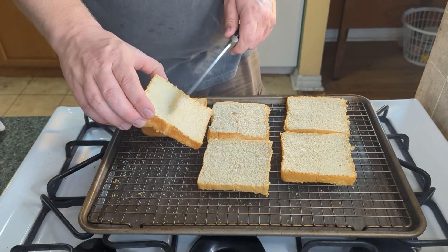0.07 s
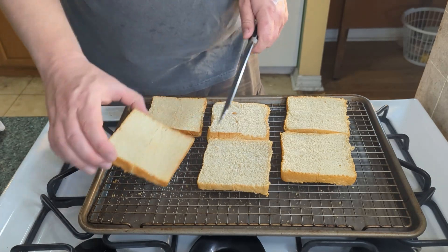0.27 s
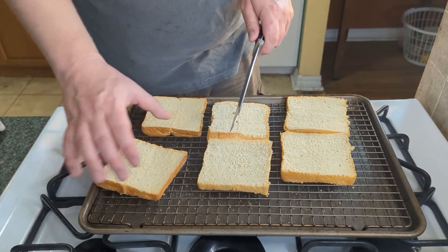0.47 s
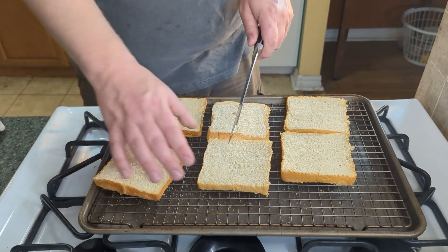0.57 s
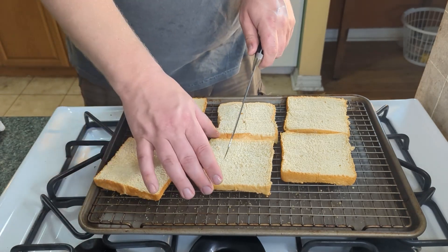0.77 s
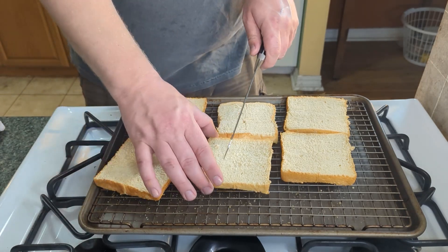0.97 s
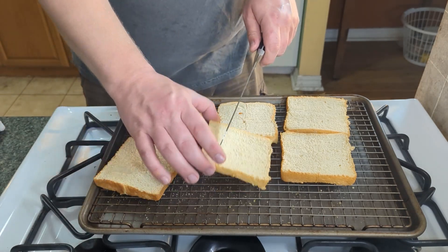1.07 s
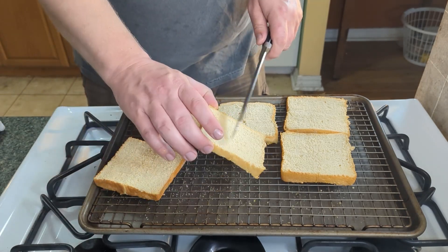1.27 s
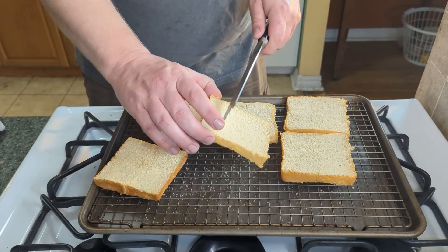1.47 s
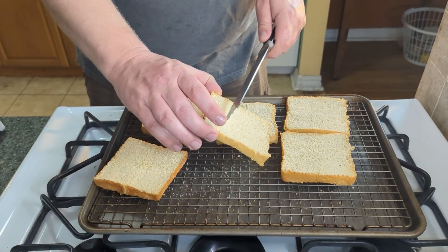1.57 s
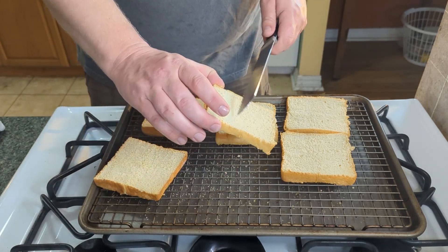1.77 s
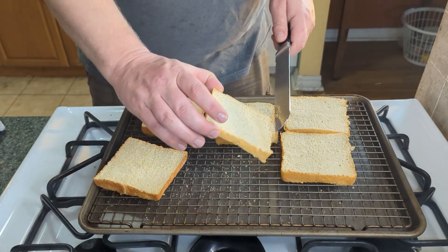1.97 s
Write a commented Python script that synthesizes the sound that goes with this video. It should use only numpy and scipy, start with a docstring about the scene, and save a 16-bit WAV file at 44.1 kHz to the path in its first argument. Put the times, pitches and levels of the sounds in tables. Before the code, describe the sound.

Dry, bright knife scrapes on crusty bread, with slices crunching down on a metal rack in a kitchen

```python
"""In a small, quietly humming kitchen, a table knife scrapes and catches on dried bread on a wire rack.
Each slip of the blade is a burst of tiny crust fractures that excite the modes of blade and rack.
Slices dropped, pushed and lifted crunch on the wires and excite the tray; pushes make it rumble.
Quick reflections and a short diffuse tail surround these sounds; low noise and steady tones lie behind."""
import sys
import numpy as np
from scipy import signal
from scipy.fft import rfft, irfft
from scipy.io import wavfile

SR = 44100
rng = np.random.default_rng(int(sys.argv[2]) if len(sys.argv) > 2 else 0)


def waveform_to_disk(signal):
    """Save audio, clipped to [-1, 1], as 16-bit WAV at the path in sys.argv[1]."""
    frames = np.transpose(np.atleast_2d(signal))
    scaled = np.clip(frames, -1, 1) * 32767
    samples = np.round(scaled).astype(np.int16)
    wavfile.write(sys.argv[1], SR, samples)


N = 89522  # samples


def amp(db):
    """Logarithmic level: converts decibels to an amplitude ratio."""
    return 10 ** (np.asarray(db) / 20)


def unit_rms(x):
    """Mean power: scales the whole signal to an rms of one."""
    return x / np.sqrt(np.mean(x ** 2) + 1e-20)


def unit_energy(x):
    """Signal energy: scales each channel to a sum of squares of one."""
    return x / np.sqrt(np.sum(x ** 2, -1, keepdims=True) + 1e-20)


def interpolated(points, hz):
    """Logarithmic pitch scale: interpolates a table along log frequency."""
    f, value = np.transpose(points)
    return np.interp(np.log(hz + 1), np.log(f + 1), value)


def add(mix, start, sound):
    """Superposition: adds a stereo sound to the mix from a start time [s]."""
    part = mix[:, max(round(start * SR), 0):][:, :sound.shape[1]]
    part += sound[:, :part.shape[1]]


def octaves(hz):
    """Spectral tilt axis: octaves from 6 kHz, held constant below 500 Hz."""
    return np.log2(np.maximum(hz, 500) / 6000)


# Likeness of the left and right channels: (frequency [Hz], correlation [-1..1])
CORRELATION = [(50, 1), (130, 0.91), (300, 0.63), (600, 0.78), (1100, 0.061), (16000, 0.024)]


def paired(x):
    """Spatial coherence: unrelated signals become alike in the bass, as at two close microphones."""
    z, hz = rfft(x), np.fft.rfftfreq(x.shape[1], 1 / SR)
    same = np.clip(interpolated(CORRELATION, hz), -1, 1)
    right = same * z[0] + np.sqrt(1 - same ** 2) * z[1]
    return irfft(np.array([z[0], right]), x.shape[1])


def coloured(x, spectrum, tilt_db=0):
    """Minimum phase: a causal filter follows from the log spectrum [dB] and tilt [dB/octave]."""
    hz = abs(np.fft.fftfreq(4096, 1 / SR))
    log_gain = np.log(amp(interpolated(spectrum, hz) + tilt_db * octaves(hz)))
    # The Hilbert transform of the log gain gives the phase.
    taps = np.fft.ifft(np.exp(np.conj(signal.hilbert(log_gain)))).real
    causal = taps[None, :len(taps) // 2]
    return signal.fftconvolve(x, causal, axes=1)[:, :x.shape[1]]


REFLECTIONS_DB, REFLECTIONS_DECAY_S = 9, 0.0016  # energy relative to direct sound; 1/e amplitude decay


def scattered(x):
    """Early reflection: tray and stove top smear each snap differently at the two microphones."""
    t = np.arange(1024) / SR
    echoes = paired(rng.standard_normal((2, len(t)))) * np.exp(-t / REFLECTIONS_DECAY_S)
    taps = amp(REFLECTIONS_DB) * unit_energy(echoes)
    taps[:, 0] += 1  # direct sound
    return signal.fftconvolve(x[None], taps, axes=1)[:, :len(x)]


CATCH_S = 0.003  # spacing of the random levels that make the crust give way in uneven clumps


def fractures(length, attack, release, rate, spread_db, catch_db, spots=3):
    """Random impulse train: clumped snaps at a few crust spots; also returns the envelope's norm."""
    t = np.arange(32768) / SR
    hold_and_release = np.exp(-np.maximum(t - length, 0) / release)
    envelope = np.minimum(t / attack, 1) * hold_and_release
    catches = np.interp(t / CATCH_S, np.arange(len(t)), rng.standard_normal(len(t)))
    spread = np.minimum(rng.exponential(1, len(t)), 4)
    size = amp(spread_db * spread + catch_db * catches)
    happens = rng.random(len(t)) < rate / SR
    sign = rng.choice([-1., 1.], len(t))
    snaps = size * envelope * happens * sign
    spot = rng.integers(0, spots, len(t))
    stereo = sum(scattered(snaps * (spot == k)) for k in range(spots))
    return stereo, np.linalg.norm(envelope)


def ring(drive, hz, t60):
    """Modal resonance: a damped two-pole mode driven by the snaps, scaled to unit energy."""
    r = np.exp(-np.log(1000) / (t60 * SR))
    poles = [1, -2 * r * np.cos(2 * np.pi * hz / SR), r * r]
    return unit_energy(signal.lfilter([1, 0, -1], poles, drive))


# Ventilation noise spectrum: (frequency [Hz], relative density [dB per Hz])
VENTILATION = [(20, -51), (36, -1), (55, -5.5), (80, -3.5), (130, -3.5), (185, 4.5), (245, -3), (310, 2),
               (410, -1), (520, -8.5), (750, -17.5), (1100, -14.5), (2200, -28), (4500, -28.5),
               (9000, -32.5), (16000, -30)]
VENTILATION_DB = -54  # rms before the recorder's low cut
# Steady appliance hum: (frequency [Hz], rms level before the low cut [dB])
APPLIANCE_HUM = [(59.5, -64.5), (192, -64.5)]


def background():
    """Stationary noise and pure tones: low ventilation noise and the hum of an appliance."""
    hz, t = np.fft.rfftfreq(N, 1 / SR), np.arange(N) / SR
    noise = paired(rng.standard_normal((2, N)))
    air = irfft(rfft(noise) * amp(interpolated(VENTILATION, hz)), N)
    hum = np.zeros(N)
    for f, db in APPLIANCE_HUM:
        hum += amp(db) * np.sqrt(2) * np.sin(2 * np.pi * (f * t + rng.random()))
    return amp(VENTILATION_DB) * unit_rms(air) + hum


CRUMBS_PER_S, CRUMB_SPREAD_DB, TOUCH_CATCH_DB = 6000, 3, 0.4  # also used by the pushes
TOUCH_RELEASE_S = 0.015  # at most; half the length for short touches
# Bread touching the rack:
# (start [s], length [s], attack [s], crunch level [dB], crunch tilt [dB/octave], tray level [dB])
BREAD_TOUCHES = [(0, 0.039, 0.00067, -48, 2, -66), (.312, 0.023, .015, -53, -2, -65),
                 (0.357, 0.026, 0.006, -32.5, 0, -35), (0.413, 0.024, 0.0049, -26.5, 2, -30),
                 (0.442, 0.029, 0.006, -39, -1.2, -34), (.485, 0.015, .004, -46, -19, -44.5),
                 (0.696, 0.061, 0.029, -43.5, -0.9, -45.5), (0.772, 0.12, 0.024, -54, -1, -58.5),
                 (0.869, .012, 0.0085, -38.5, 7.5, -55), (.89, .21, 0.0087, -57, -1.5, -59.5),
                 (0.925, 0.011, 0.0025, -46, 8.5, -60), (1.028, 0.024, 0.0036, -50, 7, -53.5)]
# Dry crust on wire: (frequency [Hz], relative density [dB per Hz])
CRUNCH_SPECTRUM = [(100, -7), (500, -11), (1000, -0.5), (1400, 2), (2100, 0), (3000, -4.5), (4200, -4),
                   (6000, -8.5), (9000, -11.5), (13000, -15), (16000, -11)]
# Rack and tray modes: (frequency [Hz], t60 [s], relative level [dB])
TRAY_MODES = [(115, .2, -13), (180, .25, -7), (205, .2, -6), (310, .12, -9), (405, .18, -4),
              (490, .23, -4.5), (564, .18, -3), (645, .12, -2), (686, .14, -4), (928, .16, -13),
              (1041, .19, -4), (1110, .14, -11), (1658, .2, -14), (1865, .2, -15), (2190, .14, -12)]
# Dull push of the slice on the tray: (frequency [Hz], relative density [dB per Hz])
THUD_SPECTRUM = [(30, -23), (80, -41), (180, 1), (260, -26), (450, 10), (700, -4), (1200, -0.5),
                 (4000, -42), (16000, -69)]
TRAY_MODES_DB, THUD_DB = -8.5, -9  # relative to each touch's tray level


def bread():
    """Impact excitation: slices land, rock and slide; crust crunches on wires and the tray booms."""
    out = np.zeros((2, N))
    for start, length, attack, crunch_db, tilt_db, tray_db in BREAD_TOUCHES:
        release = min(TOUCH_RELEASE_S, length * .5)
        snaps, strength = fractures(length, attack, release, CRUMBS_PER_S, CRUMB_SPREAD_DB, TOUCH_CATCH_DB)
        crunch = unit_energy(coloured(snaps, CRUNCH_SPECTRUM, tilt_db))
        tray = sum(amp(TRAY_MODES_DB + db) * ring(snaps, hz, t60) for hz, t60, db in TRAY_MODES)
        thud = amp(THUD_DB) * unit_energy(coloured(snaps, THUD_SPECTRUM))
        sound = amp(crunch_db) * crunch + amp(tray_db) * (tray + thud)
        add(out, start, strength * sound)
    return out


# Room reverberation: (frequency [Hz], t60 [s])
REVERBERATION = [(100, 0.96), (500, 0.45), (1500, 0.36), (4000, 0.36), (9000, 0.29), (16000, 0.23)]
TAIL_DB, TAIL_RISE_S = -8.5, 0.0033  # level relative to the near sound; onset time


def kitchen(x):
    """Diffuse reverberation: a short noise tail in which each band decays at its own rate."""
    noise = paired(rng.standard_normal((2, SR)))
    hz, t, z = signal.stft(noise, SR, nperseg=256)
    decay = amp(-60 * t / interpolated(REVERBERATION, hz)[:, None])
    tail = signal.istft(z * decay, SR, nperseg=256)[1]
    tail *= np.minimum(np.arange(tail.shape[1]) / SR / TAIL_RISE_S, 1) ** 2
    return signal.fftconvolve(x, unit_energy(tail), axes=1)[:, :N]


SLIP_ATTACK_S, SLIP_RELEASE_S = 0.0016, 0.0048
FRACTURES_PER_S, FRACTURE_SPREAD_DB, SLIP_CATCH_DB = 9000, -2.5, 2
# Slips of the blade: (start [s], length [s], level [dB], treble tilt [dB/octave],
# contact [0 = edge .. 1 = flat side], knock into the tray relative to the slip level [dB])
BLADE_SLIPS = [(0.051, 0.014, -39.5, -1, 1, -29), (.061, 0.044, -31.5, 1, 0, -36),
               (0.085, 0.018, -27, 1, 1, -31), (0.103, 0.025, -29.5, -1, 0.55, -28),
               (1.126, 0.0037, -43, -2.9, 0.62, -4.5), (1.141, 0.0087, -50, -2.5, 0.78, -10),
               (1.23, 0.012, -42.5, -2.6, 0.18, -21), (1.255, 0.0086, -51.5, 0.5, 0.15, -19),
               (1.272, 0.0047, -38.5, -0.5, 0.2, -26), (1.282, 0.0076, -29.5, 0.26, 0.049, -27),
               (1.448, 0.0054, -62.5, 5, 0.48, -26), (1.524, 0.0067, -34, -1.5, 0.56, -15.5),
               (1.595, .005, -49, 2, 0.27, -27), (1.619, .006, -43, 2, .1, -14),
               (1.624, 0.01, -36.5, -0.5, 0.079, -23), (1.636, 0.024, -28.5, 0.94, 0.02, -21.5),
               (1.863, 0.0038, -34.5, 1.9, 0.46, -14.5), (1.89, 0.0037, -33.5, -0.4, 0.11, -12.5),
               (1.909, 0.012, -32.5, .3, .2, -20), (1.924, 0.0083, -27.5, -1, 0.2, -20)]
# Crust breaking under the blade: (frequency [Hz], relative density [dB per Hz])
CRUST_SPECTRUM = [(100, -33), (400, -10), (750, -11.5), (1250, -2.5), (2500, 6), (5000, 5), (7000, 2.5),
                  (8100, 3.5), (9000, 8), (11000, 0.5), (14000, 11), (16000, -23)]
# Blade modes while pressed into the bread:
# (frequency [Hz], t60 [s], relative level on the edge [dB], relative level on the flat side [dB])
PRESSED_BLADE = [(1690, .05, -15, -15), (2050, .025, -7, -16), (2250, .028, -1, -7), (2770, .035, -4, -8),
                 (3330, .025, -10, -8), (3950, .06, -12, -3), (4620, .035, -7, -7), (5272, .07, -13, -3),
                 (6025, .04, -2, -6), (6700, .03, -11, -8), (7310, .06, -18, -8), (7530, .035, -9, -10),
                 (8560, .025, -8, -7), (10175, .045, 1, -4), (10430, .06, -10, -3), (12050, .04, -6, -2),
                 (13420, .04, -7, -2), (13680, .04, -7, -10), (13920, .05, -15, -7), (15125, .032, 0, -2)]
# Faint, longer ringing of the freed blade:
# (frequency [Hz], t60 [s], relative level on the edge [dB], relative level on the flat side [dB])
FREED_BLADE = [(1696, .35, -9, -12), (2218, .25, -9, -7), (2262, .27, -3, -9), (3935, .22, -8, -2),
               (5272, .17, -13, -1), (6045, .22, -5, -8), (7310, .16, -16, -4), (8735, .58, -26, -6),
               (9438, .33, -.5, -16), (10165, .19, -3, -9), (10430, .22, -2, -3), (13430, .16, -9, -4),
               (15110, .15, -2, -3)]
# Knock passed through the bread to the rack: (frequency [Hz], t60 [s], relative level [dB])
RACK_KNOCK = [(462, 0.051, -4), (685.5, 0.029, -9), (1049, 0.074, -2)]
CRUST_DB, PRESSED_DB, FREED_DB = -3.5, -9, -18  # relative to each slip's level


def knife():
    """Stick-slip and modal excitation: the contact point weights the modes that each slip drives."""
    out = np.zeros((2, N))
    for start, length, db, tilt_db, flat, knock_db in BLADE_SLIPS:
        snaps, strength = fractures(length, SLIP_ATTACK_S, SLIP_RELEASE_S, FRACTURES_PER_S,
                                    FRACTURE_SPREAD_DB, SLIP_CATCH_DB)
        flat = np.clip(flat, 0, 1)
        sound = amp(CRUST_DB) * unit_energy(coloured(snaps, CRUST_SPECTRUM, tilt_db))
        for modes, modes_db in ((PRESSED_BLADE, PRESSED_DB), (FREED_BLADE, FREED_DB)):
            for hz, t60, edge_db, flat_db in modes:
                contact_db = edge_db + flat * (flat_db - edge_db)
                mode_db = modes_db + contact_db + tilt_db * octaves(hz)
                sound += amp(mode_db) * ring(snaps, hz, t60)
        for hz, t60, mode_db in RACK_KNOCK:
            sound += amp(knock_db + mode_db) * ring(snaps, hz, t60)
        add(out, start, amp(db) * strength * sound)
    return out


PUSH_ATTACK_S, PUSH_RELEASE_S = 0.028, 0.014
# Slice pressed and pushed over the rack by hand: (start [s], length [s], level [dB])
HAND_PUSHES = [(.57, 0.051, -56.5), (0.704, 0.123, -55), (.83, 0.18, -60)]
# Low rumble of the tray: (frequency [Hz], relative density [dB per Hz])
RUMBLE_SPECTRUM = [(25, -20), (55, -12), (105, 0.5), (170, 5), (260, -7), (500, -10), (1500, -26),
                   (16000, -94)]


def pushes():
    """Friction noise: the tray rumbles while the hand shifts the slice over the wires."""
    out = np.zeros((2, N))
    for start, length, db in HAND_PUSHES:
        snaps, strength = fractures(length, PUSH_ATTACK_S, PUSH_RELEASE_S, CRUMBS_PER_S,
                                    CRUMB_SPREAD_DB, TOUCH_CATCH_DB)
        rumble = unit_energy(coloured(snaps, RUMBLE_SPECTRUM))
        add(out, start, amp(db) * strength * rumble)
    return out


def scene():
    """Superposition: near sounds, their reverberation and the kitchen background add linearly."""
    near = bread() + knife() + pushes()
    return background() + near + amp(TAIL_DB) * kitchen(near)


LOW_CUT_HZ, BAND_LIMIT_HZ = 49.4, 15780


def record(dry):
    """Band limitation: the recorder's low cut and linear-phase upper limit."""
    low_cut = signal.butter(4, LOW_CUT_HZ, "high", fs=SR, output="sos")
    cut = signal.sosfilt(low_cut, dry)
    band_limit = signal.firwin(511, BAND_LIMIT_HZ, window=("kaiser", 9), fs=SR)
    return signal.oaconvolve(cut, band_limit[None], "same")


dry = scene()
out = record(dry)
waveform_to_disk(out)
```